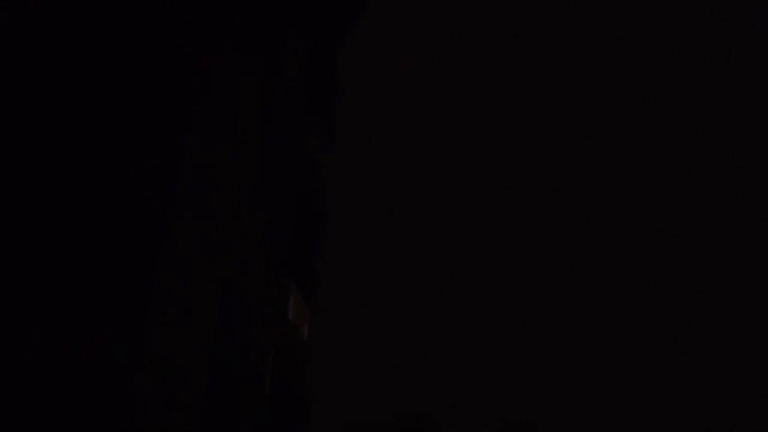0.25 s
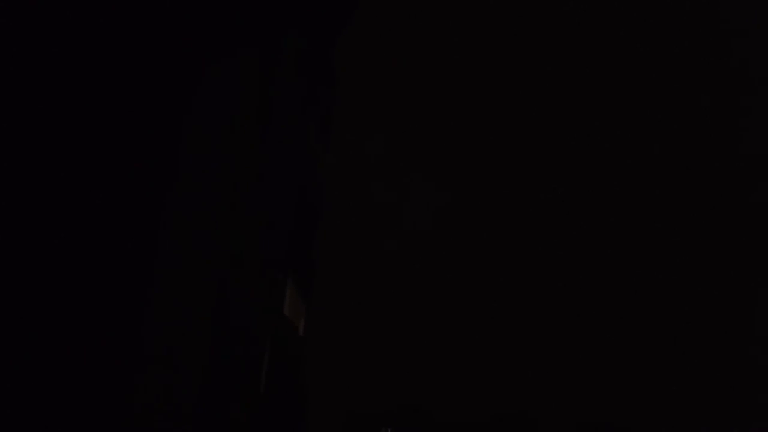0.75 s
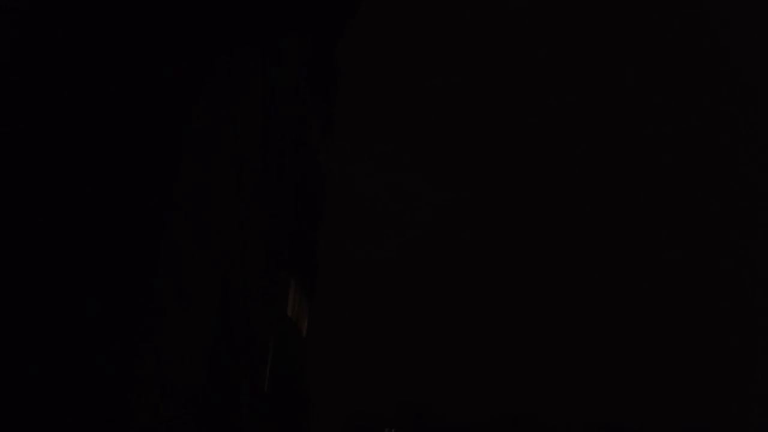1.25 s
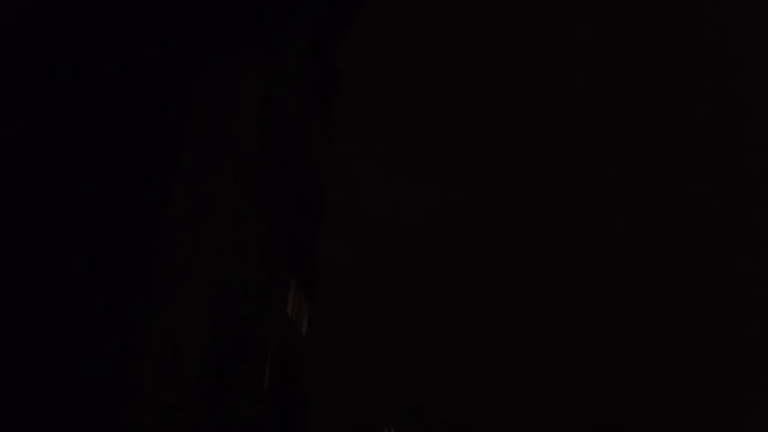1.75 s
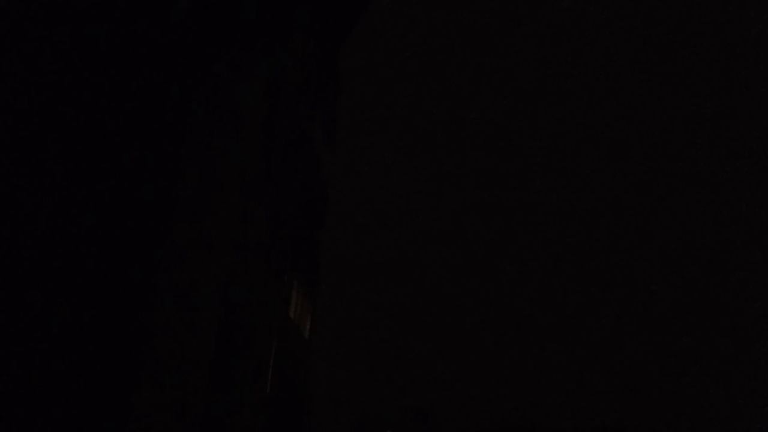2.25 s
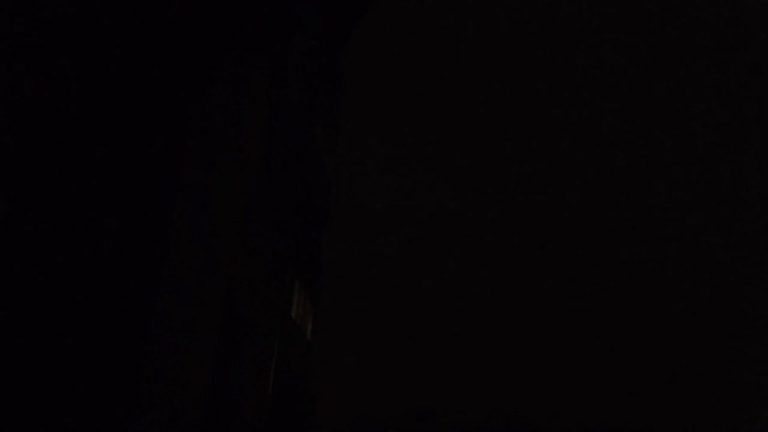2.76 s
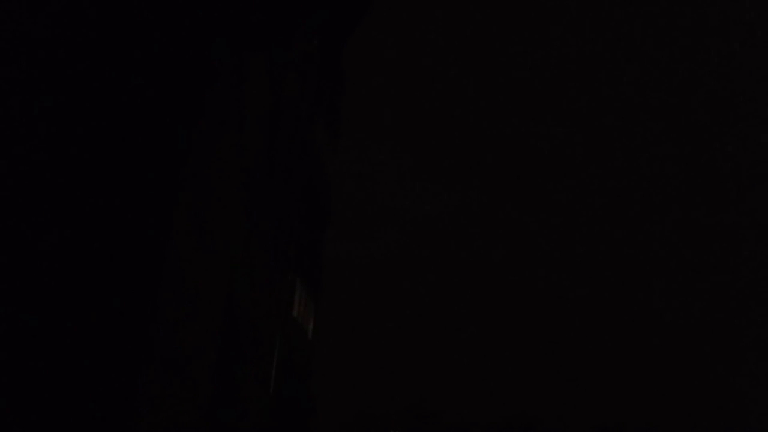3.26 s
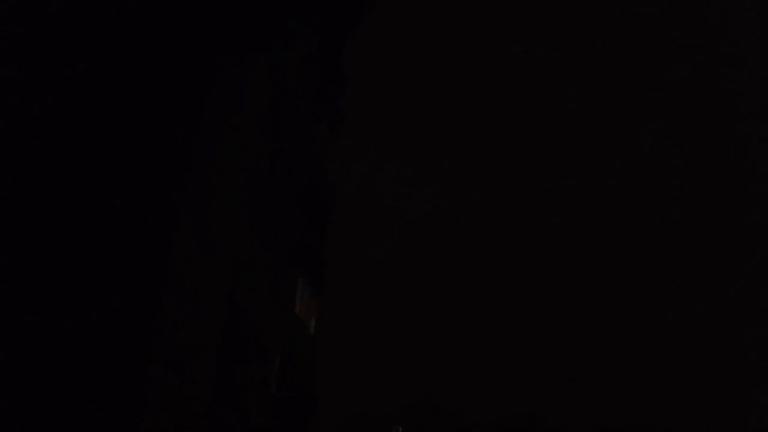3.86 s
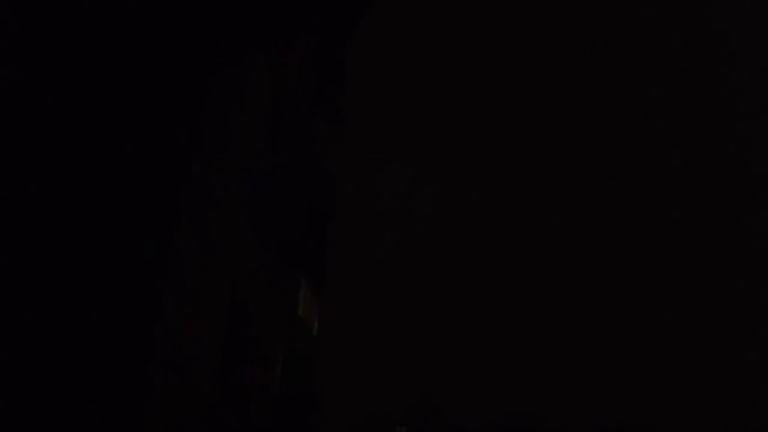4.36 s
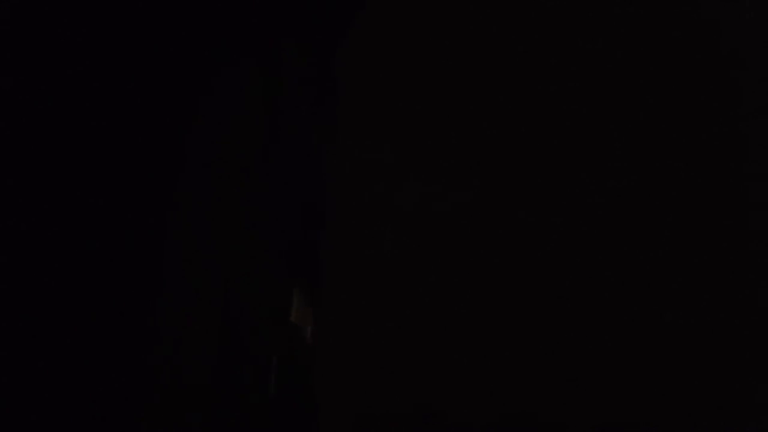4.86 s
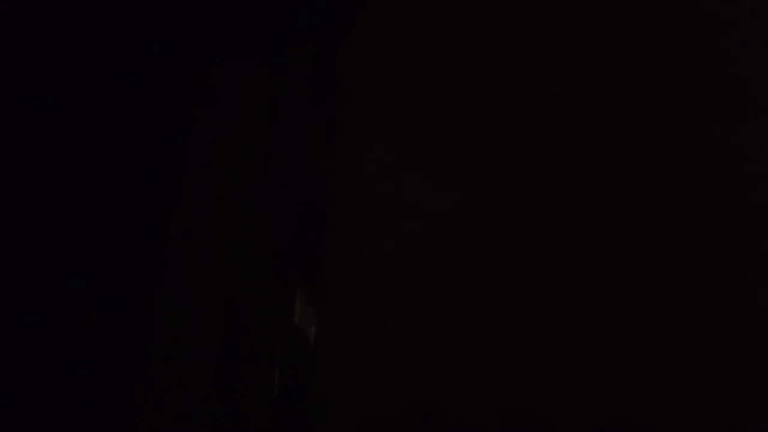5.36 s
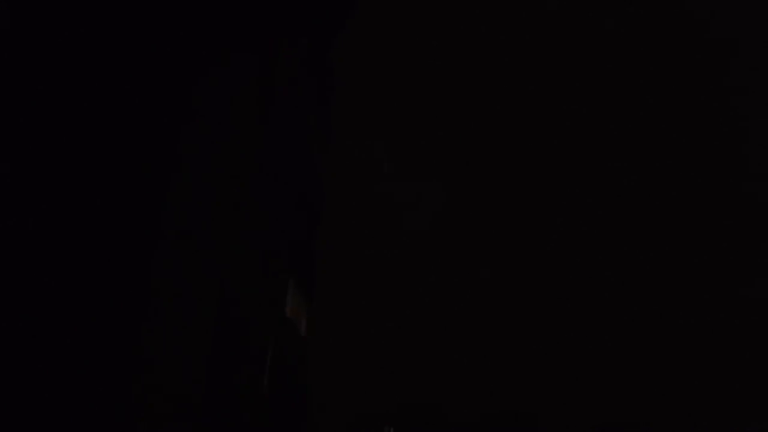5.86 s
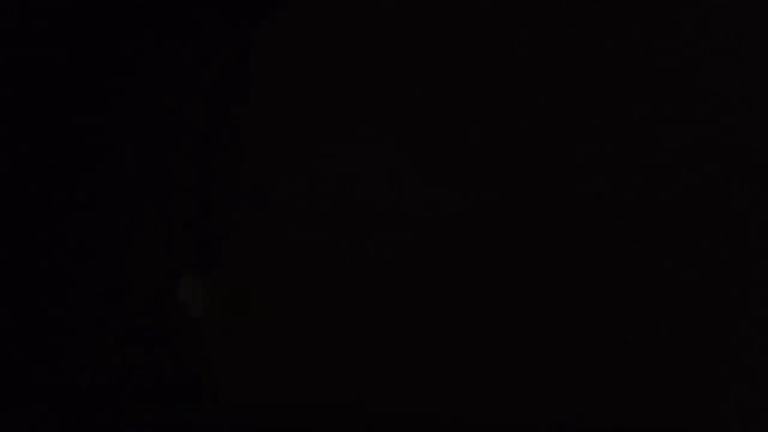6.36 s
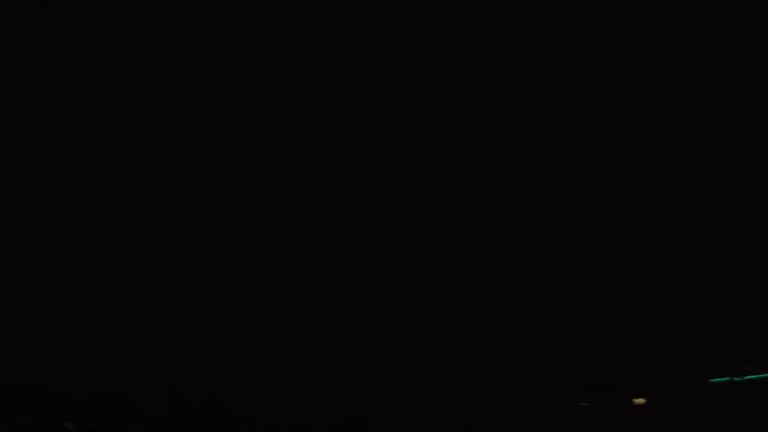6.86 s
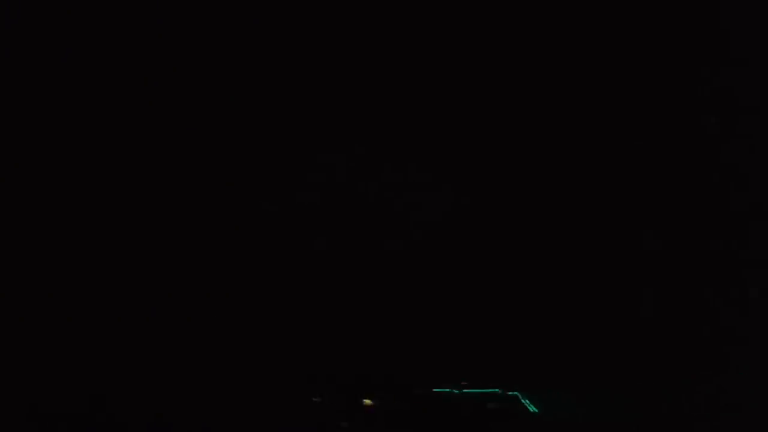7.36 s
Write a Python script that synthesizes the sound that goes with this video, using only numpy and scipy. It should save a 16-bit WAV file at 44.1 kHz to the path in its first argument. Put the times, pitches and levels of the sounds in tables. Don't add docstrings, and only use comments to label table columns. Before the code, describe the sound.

Heavy night rain heard from a shelter: a smooth wash of countless far drops beneath grainier nearby patter and fine airy splashes. Distant thunder rolls in two soft-edged peals during the first three seconds, booming under the roof, then fades to a faint rumble. Single drops tick on a close sill, sharpest around four to five seconds. Finally the microphone turns toward the rain, which grows brighter.

```python
import sys
import numpy as np
from scipy import signal
from scipy.fft import rfft, irfft, next_fast_len
from scipy.io import wavfile
from scipy.ndimage import uniform_filter1d, map_coordinates

SR = 44100
rng = np.random.default_rng(int(sys.argv[2]) if len(sys.argv) > 2 else 0)


def wrap_up_sound(samples):
    columns = np.atleast_2d(samples).T
    tamed = np.clip(columns, -1, 1)
    steps = np.round(tamed * 32767).astype(np.int16)
    wavfile.write(sys.argv[1], SR, steps)


def elevation(decibels):
    levels = np.asarray(decibels, float)
    return 10 ** (levels / 20)


N = 335601


def unit(x):
    return x / np.sqrt(np.mean(x ** 2) + 1e-20)


def curves(rows):
    seconds, *columns = np.transpose(rows)
    return [np.interp(np.arange(N) / SR, seconds, column) for column in columns]


def wobble(rate):
    knots = rng.standard_normal(int(N * rate / SR) + 4)
    return map_coordinates(knots, [np.arange(N) * rate / SR])


def coloured(x, points):
    size = next_fast_len(len(x) + 8192)
    hz, db = np.transpose(points)
    bins_hz = np.fft.rfftfreq(size, 1 / SR) + 1
    gain = elevation(np.interp(np.log(bins_hz), np.log(hz), db))
    return unit(irfft(rfft(x, size) * gain, size)[:len(x)])


def patchy(depth_db, bins, frames):
    spectra = signal.stft(rng.standard_normal(N), nperseg=512)[2]
    field = uniform_filter1d(rng.standard_normal(spectra.shape), bins, 0)
    field = uniform_filter1d(field, frames, 1)
    return unit(signal.istft(spectra * elevation(depth_db * unit(field)), nperseg=512)[1][:N])


def patter(count, spread_db, life_s):
    when, size = rng.random(count), rng.exponential(1, count)
    hits = np.bincount((when * N).astype(int), elevation(2 * spread_db * size), N)
    power = signal.lfilter([1], [1, -np.exp(-1 / (life_s * SR))], hits)
    return unit(np.sqrt(power) * rng.standard_normal(N))


# pitch in Hz, level in dB per Hz.
WASH_SPECTRUM = [(24, -50), (40, -20), (100, -22.5), (140, -12.5), (230, -9), (280, -8), (520, -5.5),
                 (950, -1), (1400, 0), (1900, -1.5), (2600, -12), (4400, -90)]


def far_wash():
    t = np.arange(N) / SR
    level_db = -36 + 1.5 * np.exp(-t / 1.1)
    return elevation(level_db) * coloured(patchy(0.27, 8, 9), WASH_SPECTRUM)


# pitch in Hz, level in dB per Hz.
YARD_SPECTRUM = [(700, -58), (1300, -12), (1900, -7), (2400, -2.5), (2800, -1), (3150, -0.5), (3600, -2),
                 (4100, -5), (5100, -8.5), (5900, -15.5), (6700, -24.5), (7600, -31.5), (9500, -43),
                 (16000, -100)]
# pitch in Hz, level in dB per Hz.
FACING_SPECTRUM = [(1500, -41), (2500, -10.5), (3300, -2.5), (4000, -4), (5200, -10.5), (6500, -21.5),
                   (8000, -36), (16000, -90)]


def near_patter(facing_share):
    grains = elevation(-10.0) * patter(count=9000, spread_db=3.0, life_s=0.0068)
    yard = elevation(-29) * coloured(patchy(0.074, 8, 5) + grains, YARD_SPECTRUM)
    facing = coloured(patchy(.6, 8, 7), FACING_SPECTRUM)
    return yard + elevation(-29.5) * np.abs(facing_share) ** 0.93 * facing


# pitch in Hz, level in dB per Hz.
SPRAY_SPECTRUM = [(3820, -30), (6500, -10.5), (7120, -3.5), (11700, -11), (15600, -20.5)]


def fine_spray(facing_share):
    grains = elevation(-13) * patter(count=6000, spread_db=2.5, life_s=.001)
    spray = coloured(patchy(.4, 14, 5) + grains, SPRAY_SPECTRUM)
    return elevation(-55 + 4 * facing_share) * spray


# time in seconds, how far it faces the rain from 0 to 1.
TURN = [
    (0, 0.2),
    (4.7, 0.03),
    (5.4, 0.42),
    (6, 0.15),
    (6.5, 0.53),
    (6.8, .55),
    (7.05, 0.82),
    (7.25, 0.98),
    (7.61, 0.7),
]


def rain():
    facing_share, = curves(TURN)
    gust = wobble(9)
    patter_sway = elevation(0.22 * gust + .3 * wobble(4.05))
    spray_sway = elevation(0.23 * gust + .2 * wobble(25))
    return far_wash() + patter_sway * near_patter(facing_share) + spray_sway * fine_spray(facing_share)


# pitch in Hz, level in dB.
WHINE = [(13690, -85)]


def electronic_whine():
    t = np.arange(N) / SR
    ripple = 1 + .6 * np.sin(2 * np.pi * 60 * t)
    return sum(elevation(db + 3) * ripple * np.sin(2 * np.pi * hz * t + .8 * wobble(10)) for hz, db in WHINE)


def rumble(points, even_s):
    x = coloured(rng.standard_normal(N), points)
    span = int(even_s * SR)
    strength = np.abs(uniform_filter1d(uniform_filter1d(x ** 2, span), span))
    return unit(x / np.sqrt(strength + .05))


# pitch in Hz, level in dB per Hz.
BOOM_SPECTRUM = [(15, -60), (30, -17), (41, -3), (53, 1), (70, -6), (90, 1), (108, 0), (130, -28),
                 (240, -100)]
PORCH_SPECTRUM = [(100, -23), (120, -6), (136, 2), (155, -1.5), (185, -21), (300, -90)]
ROLL_SPECTRUM = [(120, -54), (165, 2.5), (210, 2), (255, 1.5), (300, -25), (500, -90)]
GRUMBLE_SPECTRUM = [(190, -43), (255, -1), (320, -3), (420, -1.5), (520, -7), (700, -9.5), (1200, -82)]
# time in seconds, thunder strength in dB, extra boom of far parts of the channel in dB.
STORM = [(0, 0.5, 1), (.3, 2.5, 2), (.55, 6.5, -5), (.7, 1, -6), (1.2, 0.5, -6), (1.9, -4.5, 4),
         (2.4, -0.5, -3), (2.5, 3.5, 1), (2.62, -4, 1), (2.72, 5, 1), (2.9, 3, 7), (3.05, 0.5, 0),
         (3.9, -1.5, 0), (4.1, -7.5, 5), (5.4, -6, 5.5), (6.05, -9, 1), (6.4, -8, 1), (7.61, -13, 3)]


def thunder():
    storm_db, depth_db = curves(STORM)
    boom_db = -55.5 + 1.03 * storm_db + depth_db + 3.3 * wobble(14)
    hum_db = -53 + 0.79 * storm_db + 2.2 * wobble(11)
    roll_db = -50 + 0.84 * storm_db + 1.45 * wobble(13)
    grumble_db = -44.5 + 0.76 * storm_db + 1.44 * wobble(14)
    boom = elevation(boom_db) * rumble(BOOM_SPECTRUM, even_s=0.029)
    hum = elevation(hum_db) * rumble(PORCH_SPECTRUM, even_s=0.054)
    roll = elevation(roll_db) * rumble(ROLL_SPECTRUM, even_s=0.12)
    grumble = elevation(grumble_db) * rumble(GRUMBLE_SPECTRUM, even_s=0.02)
    return boom + hum + roll + grumble


# time in seconds, peak in dB, pitch in Hz, half length in seconds.
SHOCKS = [(.275, -39.5, 410, .02), (.49, -38, 196, .02), (.555, -37.5, 213, .025), (2.46, -45, 62, .03),
          (2.705, -37, 290, 0.028), (2.775, -36, 406, 0.016), (2.825, -33.5, 319, .02),
          (2.85, -43, 62, .05), (3.13, -44, 85, 0.023), (.32, -53, 65, .04), (.47, -49, 60, .04),
          (1.53, -42, 228, 0.026), (2.05, -50, 65, .03), (2.745, -38, 130, 0.0087),
          (2.84, -34, 180, 0.0073), (2.875, -32, 150, 0.0079), (2.92, -38, 220, .015),
          (2.99, -36, 110, 0.0078), (3.01, -37, 218, .012), (3.2, -38, 350, 0.0093), (3.4, -41, 250, 0.009),
          (3.56, -39, 180, 0.0092), (3.52, -44, 217, .04)]
# time in seconds, peak in dB.
HUMS = [
    (.27, -44),
    (.42, -42),
    (0.589, -38),
    (.73, -39),
    (2.23, -41),
    (2.87, -41),
    (3.4, -43),
    (3.519, -44),
    (3.88, -42),
    (5.15, -44),
]


def shocks():
    t = np.arange(N) / SR
    shelter_hz, shelter_half_s = 140, 0.031
    puffs = [*SHOCKS, *((s, db, shelter_hz, shelter_half_s) for s, db in HUMS)]
    out = np.zeros(N)
    for s, db, hz, half_s in puffs:
        swell = np.exp(-((t - s) / half_s) ** 2)
        out += elevation(db) * swell * np.sin(2 * np.pi * hz * (t - s))
    return out


# time in seconds, peak in dB, centre pitch in Hz.
DROPS = [(.5496, -40, 7500), (.7966, -44, 11000), (1.5858, -41, 7500), (1.8402, -43, 7500),
         (2.1226, -42, 7500), (2.4703, -42, 11000), (2.5401, -43, 11000), (2.6858, -47, 12000),
         (3.5793, -35, 11500), (4.2278, -41, 7500), (4.4293, -28, 15000), (4.43, -37, 7800),
         (4.4345, -38, 9500), (4.9766, -30, 6200), (5.0434, -39, 10500), (5.0436, -26, 5000),
         (5.246, -41, 7500), (5.3882, -33, 6900), (5.4864, -35, 8200), (5.6466, -43, 8950),
         (5.9279, -44, 10500), (6.2482, -45, 11000)]


def near_drops():
    out, t = np.zeros(N + SR), np.arange(SR // 25) / SR
    hz = np.fft.rfftfreq(len(t), 1 / SR) + 1
    lead = 40
    for s, db, centre_hz in DROPS:
        octaves = 1.2 if centre_hz > 9000 else .33
        decay = elevation(-60 * t / .007) + elevation(-26 - 60 * t / .04)
        splash = rfft(np.roll(decay * rng.standard_normal(len(t)), lead))
        splash /= uniform_filter1d(np.abs(splash), size=15)
        crack = irfft(splash * np.exp(-(np.log2(hz / centre_hz) / octaves) ** 2 * 2), len(t))
        knock_db = -28 + .6 * (db + 35)
        knock_hz = rng.uniform(3000, 5500)
        knock = elevation(knock_db - 60 * t / .01) * np.sin(2 * np.pi * knock_hz * t)
        out[round(s * SR):][:len(t)] += elevation(db) * crack / np.abs(crack).max() + np.roll(knock, lead)
    return out[:N]


def scene():
    mono = rain() + electronic_whine() + thunder() + shocks() + near_drops()
    return np.tile(mono, (2, 1))


# time in seconds, lower edge of the band in
# Hz.
SWAPS = [(.445, 13400), (.702, 5600), (.817, 14300), (1.14, 8300), (1.305, 7200), (2.188, 14400),
         (2.719, 10400), (2.719, 12400), (3.023, 7200), (3.092, 10000), (4.37, 4100), (4.37, 13100),
         (4.576, 4300), (4.576, 6900), (4.576, 12400), (5.114, 10300), (5.276, 12500), (5.276, 4300),
         (5.46, 4200), (5.46, 7600), (6.015, 4700), (6.575, 14000), (6.575, 4500), (6.575, 10300),
         (6.67, 4200), (6.67, 5700), (6.92, 13900), (6.945, 11000), (6.945, 6300)]


def noise_fill(x):
    out, t = x.copy(), np.arange(-1024, 1024)
    fade = np.clip(1.3 * np.cos(np.pi * t / len(t)) ** 2, 0, 1)
    hz = np.fft.rfftfreq(len(t), 1 / SR)
    for s, low_hz in SWAPS:
        at = round(s * SR) + t
        band = (hz > low_hz) & (hz < low_hz + 1300)
        here = irfft(rfft(fade * x[0, at]) * band)
        other = irfft(rfft(fade * x[0, at - len(t) * 2]) * band)
        out[:, at] += (np.sqrt(.5) - 1) * here + np.sqrt(.5) * other * [[1], [-1]]
    return out


def top_cut(x):
    return signal.sosfilt(signal.butter(12, 15740, fs=SR, output="sos"), x)


def record(dry):
    mix = noise_fill(dry)
    return top_cut(mix)


dry = scene()
out = record(dry)
wrap_up_sound(out)
```